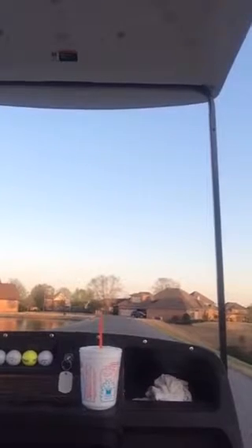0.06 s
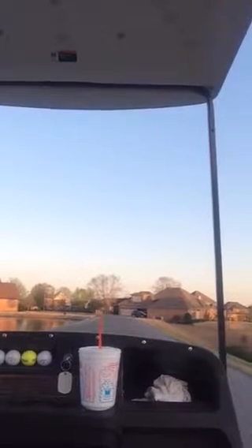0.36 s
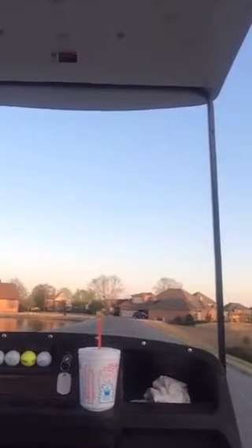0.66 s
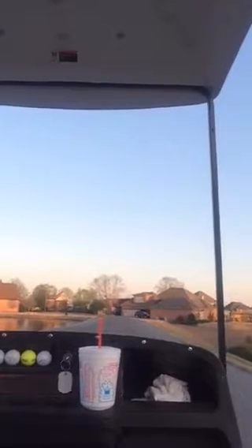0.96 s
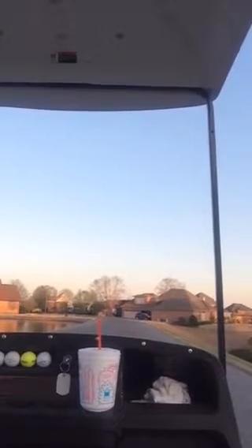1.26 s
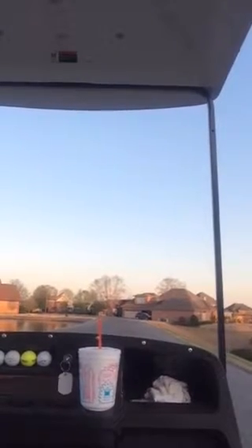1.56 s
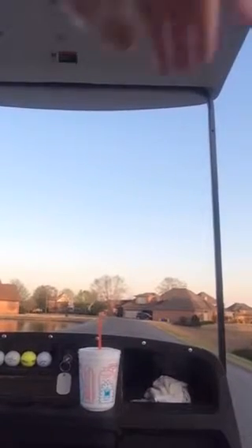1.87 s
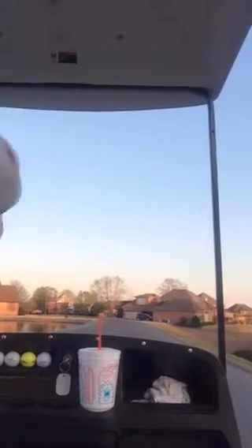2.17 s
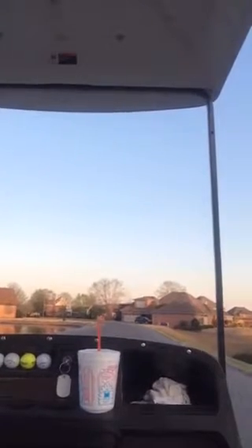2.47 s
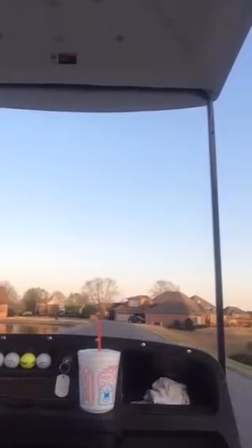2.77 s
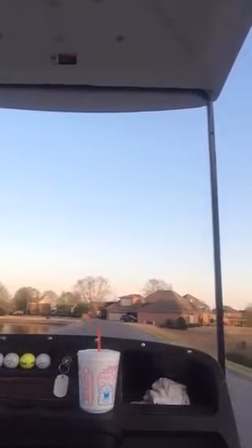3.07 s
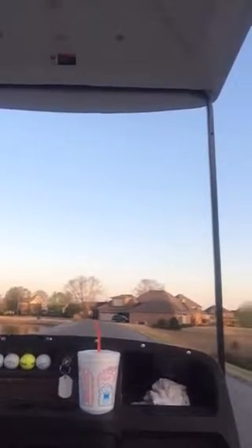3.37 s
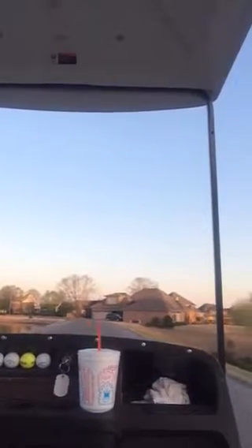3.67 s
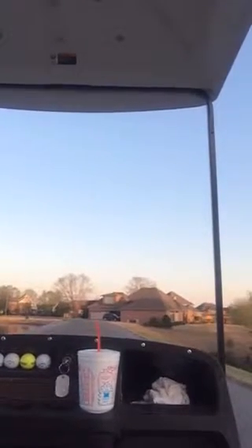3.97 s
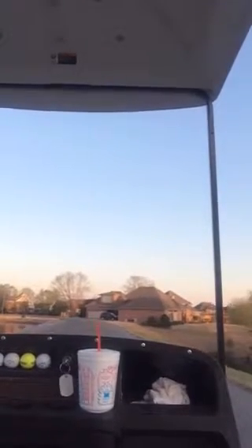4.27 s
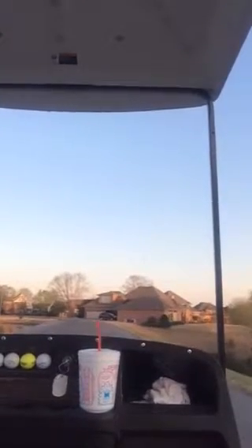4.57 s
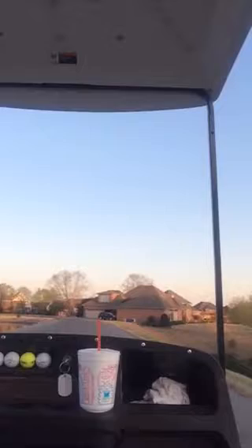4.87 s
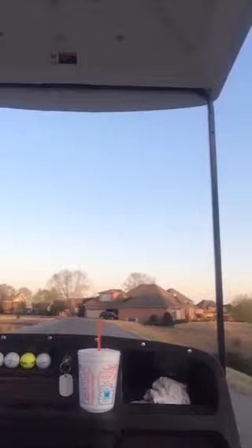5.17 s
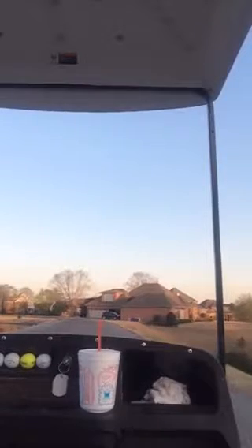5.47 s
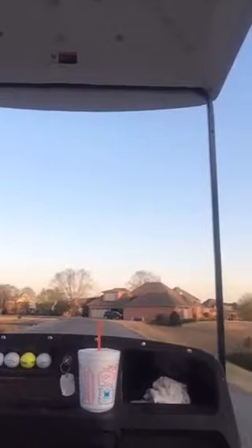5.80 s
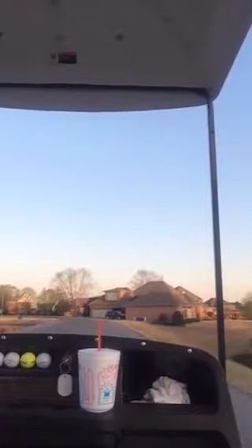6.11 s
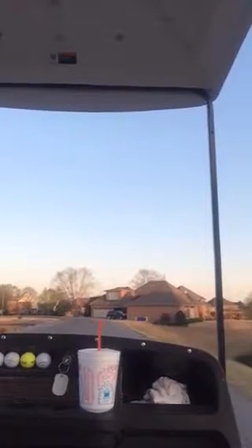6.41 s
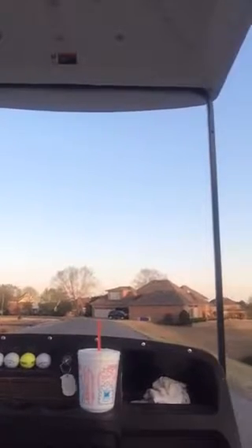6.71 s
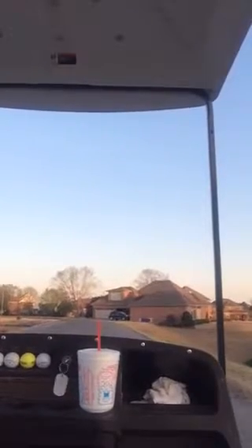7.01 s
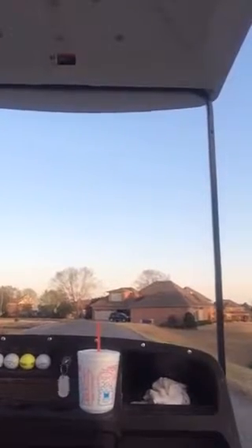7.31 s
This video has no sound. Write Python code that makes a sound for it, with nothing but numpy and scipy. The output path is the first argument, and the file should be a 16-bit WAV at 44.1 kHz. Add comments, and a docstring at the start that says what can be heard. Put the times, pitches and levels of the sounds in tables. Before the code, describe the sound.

An electric golf cart rolls along a paved path, heard from the seat in the open air. Its tyres give a low rumble throughout, swelling on each bump. For the first two and a half seconds it coasts: loose plastic panels knock rapidly and unevenly, small hard items click in the dashboard, and a metal key tag chinks lightly a few times from about 1 second. Just before 3 seconds the motor starts to pull, and bumps set off short, dull clatters in the frame until about 3.5 seconds. The motor's hum and gear tones climb in pitch as the cart gains speed, with one sharp knock at 4.5 seconds. Near 5 seconds a thin high whine swells with a soft whirr, and the pitch gradually levels off. More knocks and clicks come around 5.5 to 5.8, 6.4 and 7 seconds, over the continuing hum and rumble.

```python
"""An electric golf cart rolls along a paved path, heard from the seat; its tyres rumble throughout.
First it coasts, while loose plastic panels knock and small hard items click in the dashboard.
Just before 3 s the motor starts to pull, and bumps make the frame clatter.
The motor's hum and the gear tones in the axle housing climb in pitch as the cart gains speed.
Near 5 s a high whine swells, and scattered knocks and clicks go on to the end."""
import sys
import numpy as np
from scipy import signal
from scipy.fft import rfft, irfft, next_fast_len
from scipy.io import wavfile
from scipy.ndimage import map_coordinates

SR = 44100
rng = np.random.default_rng(int(sys.argv[2]) if len(sys.argv) > 2 else 0)


def waveform_to_disk(signal):
    """Save audio, clipped to [-1, 1], as 16-bit WAV at the path in sys.argv[1]."""
    frames = np.transpose(np.atleast_2d(signal))
    scaled = np.clip(frames, -1, 1) * 32767
    samples = np.round(scaled).astype(np.int16)
    wavfile.write(sys.argv[1], SR, samples)


N = 328545

# how rough the path is: time_s, level_db
ROUGHNESS = [(0, -51.5), (.7, -53.5), (.95, -57), (1.3, -53), (1.5, -57.5), (2.0, -58), (2.25, -53.5),
             (2.5, -58.5), (2.85, -51), (3.5, -50), (4.3, -50.5), (5.0, -50), (5.85, -53), (6.2, -50),
             (7.45, -53)]
# bumps in the path: middle_s, jolt_db, half_length_s
BUMPS = [(0.14, -28, 0.02), (0.31, -21, 0.034), (0.62, -18, 0.027), (0.75, -20, 0.015), (1.18, -31.5, 0.2),
         (1.45, -26, 0.027), (1.82, -24, .04), (2.15, -32.5, 0.047), (2.64, -28, .03), (3.05, -25, 0.083),
         (3.47, -21, 0.032), (3.66, -26.5, 0.026), (4.35, -28.5, .04), (4.61, -31, 0.012),
         (5.21, -27, 0.056), (5.5, -24.5, 0.026), (7.42, -27.5, .04)]
# tone colour of a hard hit: pitch_hz, level_db
SNAP_COLOUR = [(150, -29), (450, 19.5), (1100, -3.5), (1700, 10.5), (2300, -6), (3700, 1.5), (6000, -1),
               (8000, 0), (10000, -6), (11500, -8), (13000, -65)]
# tone colour of a hit's very high sizzle: pitch_hz, level_db
SIZZLE_COLOUR = [(9000, -67), (12000, -2), (13000, -4), (14000, 4.5), (15000, -1), (16000, -16),
                 (17000, -9)]


def amp(db):
    """Turn decibels into a number to multiply by."""
    return 10 ** (np.asarray(db) / 20)


def unit(x):
    """Scale x to an average strength (rms) of 1."""
    return x / np.sqrt(np.mean(x ** 2) + 1e-20)


def curve(rows):
    """Join (time_s, value) points with straight lines, one value per sample."""
    return np.interp(np.arange(N) / SR, *np.transpose(rows))


def wobble(rate):
    """A smooth curve through `rate` random points a second."""
    points = rng.standard_normal(int(N * rate / SR) + 4)
    return unit(map_coordinates(points, [np.arange(N) * rate / SR]))


def swells(rows):
    """A bell-shaped rise and fall for each (middle_s, level_db, half_length_s)."""
    t = np.arange(N) / SR
    return sum(amp(db) * np.exp(-((t - s) / half) ** 2) for s, db, half in rows)


def filtered(x, response):
    """Scale each frequency in x by response(hz)."""
    size = next_fast_len(N + SR // 2)
    return irfft(rfft(x, size) * response(np.fft.rfftfreq(size, 1 / SR)), size)[:N]


def coloured(x, points):
    """Give x the tone colour in (pitch_hz, level_db) points; white noise keeps its strength."""
    size = 2 ** 14
    hz, db = np.transpose(points)
    gain = amp(np.interp(np.log(np.fft.rfftfreq(size, 1 / SR) + 1), np.log(hz), db))
    # folding makes the filter ring only after a hit, never before it
    fold = np.r_[1, np.full(size // 2 - 1, 2), np.zeros(size // 2)]
    impulse = irfft(np.exp(rfft(irfft(np.log(gain)) * fold)))
    return signal.fftconvolve(x, impulse / np.linalg.norm(impulse))[:N]


def resonate(x, modes):
    """Pass x through an object that rings at each (pitch_hz, width_hz, level_db)."""
    def response(hz):
        return sum(amp(db) * 1j * hz * width / (pitch ** 2 - hz ** 2 + 1j * hz * width) * (-1) ** k
                   for k, (pitch, width, db) in enumerate(modes))
    return filtered(x, response)


def add(track, s, sound):
    """Mix a sound into the track, starting at s seconds."""
    start = max(0, round(s * SR))
    part = track[start:start + len(sound)]
    part += sound[:len(part)]


def shaking():
    """How hard the body shakes: the roughness of the path plus its bumps."""
    return np.hypot(amp(curve(ROUGHNESS) + 22), swells(BUMPS))


def shaft_tones(turns, rows, waver_db, slip):
    """Tones at multiples of the motor's turning rate, wavering in level and in phase (slip)."""
    return sum(amp(db + waver_db * wobble(8.3)) * np.sqrt(2)
               * np.sin(2 * np.pi * round(multiple) * turns + slip * wobble(14)) for multiple, db in rows)


def air(level_db=-73):
    """Air flows past with a faint hiss that swells briefly twice."""
    # tone colour of the air: pitch_hz, level_db
    colour = [(1000, 7), (4000, 6), (5000, -4), (6700, 2.5), (7700, -6), (8600, 5), (9800, -13),
              (14000, -19), (16000, -36)]
    # swells of the hiss: middle_s, level_db, half_length_s
    surges = [(2.92, -70, 0.073), (4.94, -51.5, .06)]
    return (amp(level_db) + swells(surges)) * unit(coloured(rng.standard_normal(N), colour))


def controller(switch_hz=15730):
    """The speed controller's fast switching sings faintly while the pedal is pressed."""
    # strength of the tone: time_s, level_db
    levels = [(1.5, -105), (2.1, -86), (2.7, -72), (3.4, -78), (3.9, -84), (4.8, -82), (5.0, -80),
              (7.45, -80)]
    return amp(curve(levels) + 1.5 * wobble(3)) * np.sin(2 * np.pi * switch_hz * np.arange(N) / SR)


def squeaks(width=0.066):
    """Plastic trim rubs, making short, scratchy squeaks from narrow bands of noise."""
    # rubs of the trim: middle_s, level_db, pitch_hz, half_length_s
    rubs = [(2.11, -50, 1970, 0.014), (2.16, -44, 1720, 0.021), (4.632, -54, 4060, 0.026),
            (4.643, -54, 3550, .03), (4.9, -58, 3800, 0.038), (4.926, -57, 3500, 0.031),
            (6.15, -62, 4520, .03), (6.255, -57, 4520, 0.013)]
    out = np.zeros(N)
    for s, db, pitch, half in rubs:
        band = filtered(rng.standard_normal(N), lambda hz: 1 / (1 + ((hz - pitch) / (width * pitch)) ** 2))
        out += unit(band) * swells([(s, db, half)])
    return out


def jiggle(ticks_per_s=20):
    """Loose items tick faintly, more often when the path shakes the cart harder."""
    hits = rng.random(N) < unit(shaking()) * ticks_per_s / SR
    ticks = hits * amp(-34 + 4 * np.clip(rng.standard_normal(N), -2, 2))
    return coloured(ticks, SNAP_COLOUR) + amp(-22) * coloured(ticks, SIZZLE_COLOUR)


def key_tag(ring_hz=7600, fade_s=0.0056, width_hz=1900):
    """Hard swings strike the metal tag on the key: a bright chink and a short ring."""
    # hits on the tag: start_s, ring_db
    hits = [(1.004, -40.5), (1.101, -35), (1.277, -33.5), (1.504, -44), (2.351, -27), (4.839, -39.5)]
    ring, chink, t = np.zeros(N), np.zeros(N), np.arange(SR // 10) / SR
    for (s, db), detune in zip(hits, rng.standard_normal(len(hits))):
        pitch = ring_hz * (1 + .015 * detune)
        add(ring, s, amp(db - 60 * t / fade_s) * np.sin(2 * np.pi * pitch * t))
        add(chink, s - .0005, amp(db + 26) * np.exp(-t / 0.00045) * rng.standard_normal(len(t)))
    return ring + filtered(chink, lambda hz: np.exp(-((hz - ring_hz) / width_hz) ** 2))


def frame():
    """Bumps set off a short, dull clatter in the frame."""
    # clatters: start_s, relative_db, fade_s (time to fall by 60 dB)
    clatters = [(0.602, -28, 0.027), (2.965, -31.5, 0.04), (3.036, -38, 0.06), (3.058, -29, 0.058),
                (3.174, -29.5, 0.091), (3.281, -36, 0.077), (3.433, -26, 0.071), (4.468, -30, 0.031),
                (5.647, -24.5, 0.032), (7.02, -31, 0.084)]
    # tone colour of the frame: pitch_hz, level_db
    colour = [(200, -28), (450, 4), (700, 12.5), (1000, 2), (1300, 2), (1600, -7), (2100, -12.5),
              (3500, -17.5), (7000, -62), (14000, -62)]
    out, t = np.zeros(N), np.arange(SR // 4) / SR
    attack = 1 - np.exp(-t / 0.00055)
    for s, db, fade_s in clatters:
        add(out, s, amp(db + 3.5 - 60 * t / fade_s) * attack * rng.standard_normal(len(t)))
    return coloured(out, colour)


def loose_items(tock_hz=561, tock_half_s=0.0009, bounce_s=(.005, 0.02)):
    """Small items graze the dashboard, hit it with a crack and a dull tock, and bounce once."""
    # hits: time_s, relative_db, sizzle_db (added to relative_db)
    clicks = [(0.082, -30, 2), (0.087, -28.5, -8), (0.18, -37.5, -9), (0.27, -16, -3.5),
              (0.348, -24.5, -13), (0.439, -42, -2), (0.513, -20, -8), (0.563, -29, -12),
              (0.568, -25, -13.5), (0.618, -19.5, -10), (0.631, -27, -19), (0.694, -38, -11),
              (0.708, -28, -13), (0.724, -30.5, -13), (0.736, -29.5, -13), (0.791, -32, -17),
              (0.823, -26.5, -14), (0.926, -23, -13), (1.005, -33.5, -8), (1.1, -32, -16), (1.123, -30, -9),
              (1.186, -24, -16), (1.235, -32, -1), (1.277, -24, -12), (1.309, -28.5, -10),
              (1.334, -33.5, -8), (1.378, -37, -20), (1.414, -43, -15), (1.504, -24.5, -0.5),
              (1.849, -22.5, -6), (2.165, -44, -18), (2.23, -41, -12.5), (2.351, -23, -1), (4.466, -21, -1),
              (4.737, -36, -8), (4.79, -38, -24), (4.839, -34.5, -8), (5.449, -30, -19),
              (5.506, -31.5, -12), (5.646, -23.5, -3), (6.078, -38, -23), (6.29, -37, -16),
              (6.361, -35.5, 0), (6.886, -40, -8), (6.961, -32, -17), (7.018, -21.5, 5),
              (7.023, -15, -18.5), (7.099, -27, -8), (7.222, -25, -3), (7.312, -27, -11)]
    # where the dashboard rings: pitch_hz, width_hz, level_db
    dashboard_modes = [(1000, 53, 7), (1740, 72, -2), (2650, 230, 6.5), (3630, 29, -22), (5100, 370, -10),
                       (8000, 370, -26)]
    snap, sizzle, tock = np.zeros((3, N))
    lead_s = .015
    t = np.arange(SR // 15) / SR - lead_s
    crack = np.exp(-np.abs(t) / np.where(t < 0, 0.0003, 0.00045))
    scrape = amp(-32.5) * np.exp(-np.abs(t) / 0.0051)
    for (s, db, sizzle_db), (early, phase, flight) in zip(clicks, rng.random((len(clicks), 3))):
        start = s - lead_s
        graze = amp(-10.5) * np.exp(-np.abs(t + 0.00126 + 0.00287 * early) / 0.00023)
        burst = (crack + graze + scrape) * rng.standard_normal(len(t))
        burst = burst / np.linalg.norm(burst) * np.sqrt(SR / 1000)
        add(snap, start, amp(db + 4.5) * burst)
        add(snap, start + np.interp(flight, (0, 1), bounce_s), amp(db - 21.5) * burst)
        add(sizzle, start, amp(db + sizzle_db) * burst)
        # the dashboard gives under the hit; harder, brighter hits push it less
        flex = np.sin(2 * np.pi * (tock_hz * t + phase)) / np.cosh(t / tock_half_s)
        add(tock, start, amp(db - 1 - 0.37 * sizzle_db) * flex)
    contact = coloured(snap, SNAP_COLOUR)
    return contact + resonate(contact, dashboard_modes) + tock + coloured(sizzle, SIZZLE_COLOUR)


def panels(middle_hz=381.7, half_length_s=.0013, scatter=0.054):
    """A loose panel ticks as it breaks free, slaps its stop and chatters back."""
    # knocks, often about 70 ms apart as the panel rocks: time_s, peak_db
    knocks = [(0.179, -19.5), (0.274, -11.5), (0.512, -16.5), (0.601, -13.5), (0.63, -4), (0.734, -16.5),
              (0.786, -16), (0.814, -8), (0.878, -20.5), (0.929, -18), (1.012, -17.5), (1.163, -18),
              (1.225, -19.5), (1.278, -15.5), (1.309, -17.5), (1.422, -14.5), (1.488, -9.5), (1.636, -17.5),
              (1.698, -18.5), (1.763, -16.5), (1.833, -9.5), (1.893, -11), (1.977, -15), (2.058, -17),
              (2.238, -13.5), (4.473, -5), (5.46, -10.5), (5.511, -3), (5.648, -11), (5.719, -5.5),
              (5.787, -6), (6.355, -4.5), (6.43, -14), (6.969, -7), (7.095, -7)]
    # tone colour of the panel's contact: pitch_hz, level_db
    clack_colour = [(400, -1.5), (800, 11.5), (1200, 1), (2200, -6.5), (3500, -5), (6000, -35), (9000, -29),
                    (12000, -33), (14000, -28), (16500, -30)]
    thud, clack, ticks = np.zeros((3, N))
    lead_s = .02
    t = np.arange(round(2 * lead_s * SR)) / SR - lead_s
    buzz = 0.27 * np.exp(-np.abs(t) / 0.012) * (t > 0)  # the edge buzzes on after the hit
    for (s, db), (phase, late, size, early, stiff) in zip(knocks, rng.random((len(knocks), 5))):
        start = s - lead_s
        quickness = 1 + scatter * (2 * stiff - 1)
        progress = quickness * t / half_length_s
        pulse = 1 / np.cosh(progress)
        pitch = quickness * middle_hz * (1 + 0.26 * np.tanh(progress / 2))  # rises as the slap stiffens
        slap = amp(db) * np.sin(2 * np.pi * (np.cumsum(pitch) / SR + phase)) * pulse
        add(thud, start, slap)
        add(thud, start + 0.017 + 0.00804 * late, amp(-18 + 4.9 * size) * slap)
        add(clack, start, amp(db - 23.5) * rng.standard_normal(len(t)) * (pulse + buzz))
        tick = amp(db - 29) * rng.standard_normal(len(t)) * np.exp(-np.abs(t) / 0.00078)
        add(ticks, start - .002 - 0.0031 * early, tick)
    return thud + coloured(clack, clack_colour) + coloured(ticks, SNAP_COLOUR)


def tyres():
    """The path shakes the body; the treads roar over its grain, louder on each bump."""
    # tone colours of the body and the treads: pitch_hz, level_db
    body_colour = [(15, -69), (28, -18), (45, -5.5), (70, 1), (90, -1.5), (115, 1), (150, -7.5),
                   (200, -10.5), (300, -30.5), (600, -86.5)]
    tread_colour = [(80, -32.5), (170, -6.5), (250, 0), (350, 0), (450, -7), (600, -12), (800, -17),
                    (1100, -21.5), (1400, -22), (2200, -30), (4000, -41.5), (6000, -55), (10000, -56.5),
                    (16000, -67)]
    rumble = shaking() * amp(0.63 * wobble(16)) * unit(coloured(rng.standard_normal(N), body_colour))
    tread = np.hypot(amp(curve(ROUGHNESS) + 13.5), amp(-14) * swells(BUMPS))
    roar = tread * amp(2.4 * wobble(45)) * unit(coloured(rng.standard_normal(N), tread_colour))
    return rumble + roar


def brushes(speed, turns, housing_modes, cruise_turns_per_s=35):
    """The motor's brushes rub in step with the shaft: a whirr in the housing, a hiss and a high whine."""
    # strength of the whirr and the whine: time_s, level_db
    whirr_levels = [(0.0, -46), (0.18, -49.5), (0.31, -53), (1.2, -57), (1.45, -63.5), (2.09, -58),
                    (2.24, -54.5), (2.76, -53.5), (2.97, -49.5), (4.81, -46.5), (5.15, -42.5), (5.75, -46),
                    (6.29, -42.5), (7.45, -43.5)]
    whine_levels = [(2.5, -91.5), (4.7, -75), (4.95, -58), (5.85, -63), (6.2, -60), (7.45, -57.5)]
    # tone colour of the hiss: pitch_hz, level_db
    hiss_colour = [(2000, -3), (3300, -25), (3900, -1.5), (4900, -3.5), (5500, -1), (5900, 5.5), (6250, 6),
                   (6700, 5.5), (7700, -7.5), (8300, 6), (9100, -4.5), (10200, -9), (14000, -22),
                   (16000, -40)]
    # where the whine rings: pitch_hz, width_hz, level_db
    whine_modes = [(5460, 230, -5.5), (5940, 94, 5.5), (6610, 98, -9), (8210, 72, -14)]
    angle = 2 * np.pi * turns
    swell = unit(1 + 0.072 * np.cos(angle) + 0.31 * np.cos(3 * angle))
    # the same worn surface passes at every turn, so part of the rubbing repeats
    surface = rng.standard_normal(1024)
    worn = unit(map_coordinates(surface, [turns % 1 * len(surface)], mode="grid-wrap"))
    rub = swell * unit(rng.standard_normal(N) + 0.77 * worn)
    whirr_db = curve(whirr_levels)
    whirr = amp(whirr_db + 0.5) * unit(resonate(rub, housing_modes))
    # the hiss grows with speed and follows the whirr
    hiss_db = -58.5 + 5.5 * np.log2(speed / cruise_turns_per_s) + 0.74 * (whirr_db - whirr_db.max())
    hiss = amp(hiss_db) * unit(coloured(rub, hiss_colour))
    whine = amp(curve(whine_levels)) * unit(resonate(rub, whine_modes))
    return whirr + hiss + whine


def gears(turns, housing_modes):
    """Gear teeth meet, making tones that sweep through the pitches at which the housing rings."""
    # gear tones: cycles_per_turn, level_db
    tones = [(28, -5.5), (44, 5), (50, -10.5), (56, 1.5), (71, -6.5), (84, -2)]
    # how loud the motor's load makes the gears: time_s, level_db
    load = [(0, -59), (1.5, -96.5), (2.7, -62), (3.0, -50), (3.4, -65), (3.8, -53), (4.4, -59), (5.0, -47),
            (5.5, -61), (7.45, -61.5)]
    housing = resonate(shaft_tones(turns, tones, waver_db=5.5, slip=0.45), housing_modes)
    floor = amp(-11) * shaft_tones(turns, tones[:1], waver_db=7.0, slip=.5)
    return amp(curve(load)) * (housing + floor)  # the lowest tone also comes through the floor


def motor():
    """The motor hums, drives the gears and rubs its brushes, all from one turning shaft."""
    # speed of the shaft: time_s, turns_per_s
    speeds = [(0, 20), (1.5, 18), (2.5, 17.2), (2.85, 18.5), (3.05, 20.5), (3.6, 25), (3.75, 25.9),
              (4.0, 27.5), (4.25, 28), (4.5, 29.4), (4.75, 31.1), (5.0, 31.7), (5.4, 32.5), (5.9, 33.4),
              (6.6, 34.2), (7.45, 34.6)]
    # tones of the hum: cycles_per_turn, level_db
    hum_tones = [(8, -7.5), (12, -1), (16, -17)]
    # strength of the hum: time_s, level_db
    hum_levels = [(0, -44.5), (2.4, -51.5), (3, -50.5), (5, -46), (6.2, -50), (6.6, -39.5), (7.45, -43.5)]
    # where the axle housing rings: pitch_hz, width_hz, level_db
    housing_modes = [(1484, 74, 0.5), (1694, 107, 4), (2360, 600, -18), (2724, 82, -7.5)]
    speed = curve(speeds)
    turns = np.cumsum(speed) / SR
    gear_whine = gears(turns, housing_modes)
    hum = amp(curve(hum_levels)) * shaft_tones(turns, hum_tones, waver_db=2.0, slip=0.24)
    return gear_whine + hum + brushes(speed, turns, housing_modes)


def scene():
    """Everything as heard from the seat, in the open air."""
    cart = tyres() + motor() + controller() + air()
    rattles = panels() + loose_items() + key_tag() + jiggle() + frame() + squeaks()
    return (cart + rattles)[None]


def record(dry):
    """Cut off the very highest treble, above 16500 Hz."""
    return filtered(dry[0], lambda hz: hz < 16500)[None]


dry = scene()
out = record(dry)
waveform_to_disk(out)
```